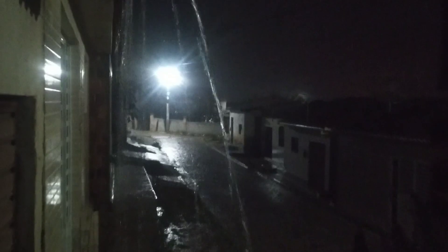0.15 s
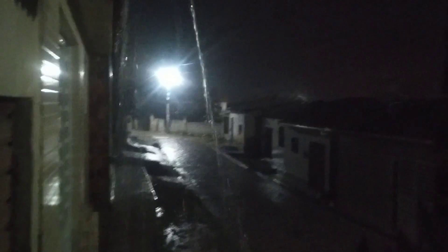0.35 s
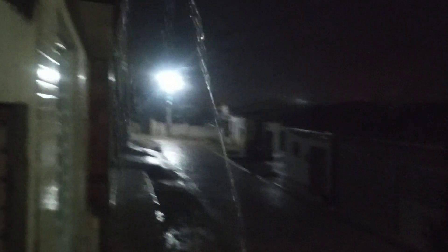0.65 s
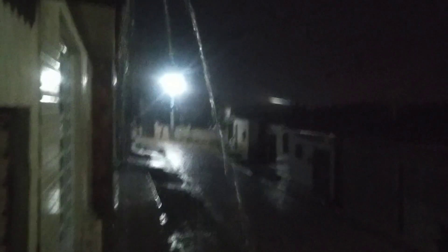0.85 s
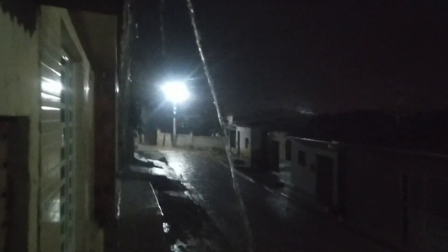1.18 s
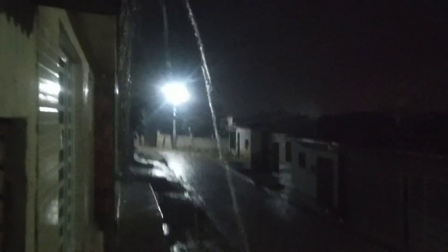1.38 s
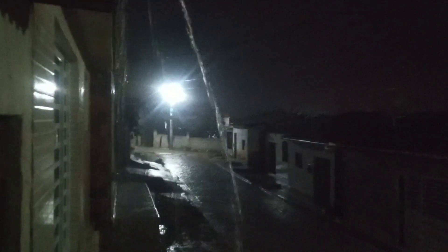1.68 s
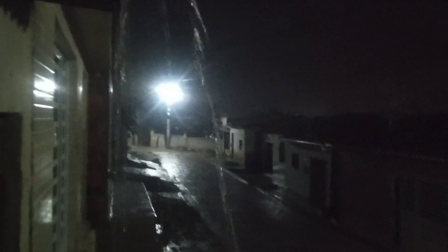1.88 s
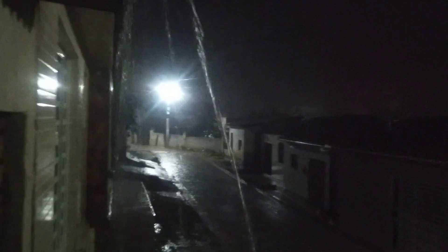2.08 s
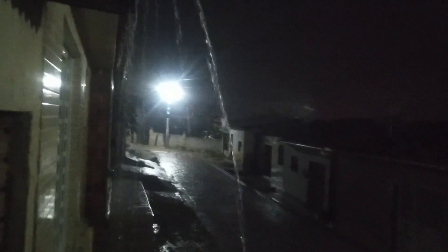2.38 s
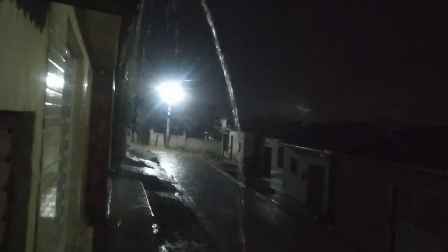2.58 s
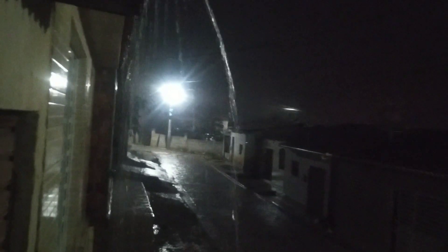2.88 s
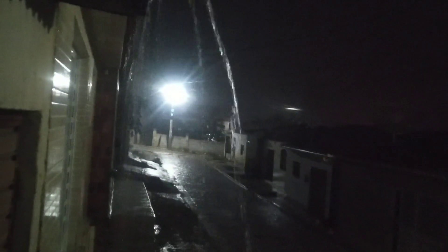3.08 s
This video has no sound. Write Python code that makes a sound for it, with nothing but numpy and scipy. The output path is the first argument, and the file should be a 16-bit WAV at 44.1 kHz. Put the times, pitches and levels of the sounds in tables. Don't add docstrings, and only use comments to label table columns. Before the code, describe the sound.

Silence until about 0.27 s, then heavy rain appears abruptly: a broad, slightly dull wash with fine nearby ticks, a low roof drone and short splashes. Roof runoff churns on the ground, swelling near 0.7 and 1.2 s. From 1.25 s wind rumbles, thumps and hisses on the small microphone, with sharp drop pops around 1.3, 1.6-1.8 and 2.6-2.9 s. A hard splash hits at 2.3 s; runoff grows stronger as rain eases toward 3.25 s.

```python
import sys
import numpy as np
from scipy import signal
from scipy.fft import rfft, irfft, next_fast_len
from scipy.io import wavfile
from scipy.ndimage import uniform_filter1d, map_coordinates

SR = 44100
rng = np.random.default_rng(int(sys.argv[2]) if len(sys.argv) > 2 else 0)


def attenuation_scalar(level_db):
    decades = np.asarray(level_db, float) / 20
    return 10 ** decades


def unload_audio(sound):
    columns = np.transpose(np.atleast_2d(sound))
    steps = np.round(np.clip(columns, -1, 1) * 32767)
    wavfile.write(sys.argv[1], SR, steps.astype(np.int16))


N = 143325
T = np.arange(N) / SR
PORT_TOP_HZ = 5600


def unit(x):
    return x / np.sqrt(np.mean(x ** 2) + 1e-20)


def shape(points):
    f, v = np.transpose(points)
    return lambda hz: attenuation_scalar(np.interp(np.log(hz + 1), np.log(f + 1), v))


def curves(rows):
    s, *cols = np.transpose(rows)
    return [np.interp(T, s, c) for c in cols]


def wobble(rate):
    return map_coordinates(rng.standard_normal(4000), [T * rate])


def filtered(x, response):
    m = next_fast_len(len(x) + 8192)
    hz = np.fft.rfftfreq(m, 1 / SR)
    return irfft(rfft(x, m) * response(hz), m)[:len(x)]


def patches(shape_2d, bins, frames):
    field = uniform_filter1d(rng.standard_normal(shape_2d), size=bins, axis=0)
    return unit(uniform_filter1d(field, size=frames, axis=1))


def rush(response, patchy_db):
    z = signal.stft(rng.standard_normal(N), nperseg=256)[2]
    gain = attenuation_scalar(patchy_db * patches(z.shape, bins=7, frames=9))
    noise = signal.istft(z * gain, nperseg=256)[1][:N]
    return unit(filtered(noise, response))


def dulled(x):
    return filtered(x, lambda f: 1 / np.sqrt(1 + (f / 10500) ** 6))


def droplets(count, hz, spread, cycles, size_db):
    u = rng.random((count, 3))
    n = np.arange(160)
    t = n / SR
    pitch = np.clip(hz * np.exp(spread * rng.standard_normal(count)), 500, 14000)[:, None]
    size = attenuation_scalar(-size_db * np.log(u[:, 1:2] + 1 / 50))
    envelope = np.exp(-t * pitch / cycles) * np.tanh(t * pitch)
    grain = size * envelope * np.sin(2 * np.pi * pitch * t)
    at = (u[:, 0] * N).astype(int)[:, None] + n
    return unit(np.bincount(at.ravel(), grain.ravel(), N + 160)[:N])


# time_s, rain_db, stream_nearness_db
RAIN = [(.28, -57.5, -19), (.45, -54, -22), (.72, -53.5, -5), (.9, -54.5, -18), (1.15, -53, 4),
        (1.35, -54, -9), (1.62, -53.5, 4), (1.9, -54, -3), (2.15, -52.5, -16), (2.36, -54, 8),
        (2.55, -53.5, 5.5), (2.75, -55.5, 11), (2.98, -58, 10), (3.12, -58, 11), (3.25, -58.5, 11)]
# freq_hz, density_db
FAR = [(71, -39), (120, -3), (532, -5), (800, -0.5), (867, 0.5), (4340, -8.5), (7850, -13), (13600, -27.5),
       (15700, -37)]


def rain():
    rain_db = curves(RAIN)[0]
    wash_db = 7.5 + 0.4 * wobble(5.71) + 0.97 * wobble(30.15)
    wash = attenuation_scalar(wash_db) * rush(shape(FAR), patchy_db=1.65)
    clump_db = 2.5 * np.tanh(wobble(30.08)) * 1.5
    ticks = droplets(count=5000, hz=5000, spread=0.503, cycles=3.6, size_db=5.5)
    patter = attenuation_scalar(1 + clump_db) * ticks
    return attenuation_scalar(rain_db) * (wash + dulled(patter))


# freq_hz, density_db
STREAM = [(300, -60), (800, -5.5), (1500, 2.5), (2200, 3), (2900, -1), (4000, -36), (9000, -36)]


def stream():
    near_db = curves(RAIN)[1]
    level_db = -56.5 + near_db + 1.0 * wobble(24.7)
    return attenuation_scalar(level_db) * rush(shape(STREAM), patchy_db=1.5)


# time_s, wind_db
WIND = [(.32, -53.5), (1.2, -59), (1.3, -43.5), (1.47, -42), (1.57, -35.5), (1.66, -43), (1.8, -33),
        (1.87, -39.5), (1.94, -44), (2.02, -33.5), (2.13, -37.5), (2.25, -40.5), (2.4, -42.5), (2.55, -41),
        (2.75, -38), (2.93, -34), (3.04, -40.5), (3.25, -39.5)]
# freq_hz, density_db
RUMBLE = [(7.1, -49), (12, 11.5), (25, -3), (194, -19), (294, -20.5), (385, -24.5), (900, -27), (1170, -59),
          (1980, -120)]


def buffeting():
    wind_db, = curves(WIND)
    uneven = attenuation_scalar(1.2 * wobble(24.94)) * rush(shape(RUMBLE), patchy_db=1.5)
    return attenuation_scalar(wind_db - 0.5) * unit(uneven)


# time_s, hiss_db
DRAUGHT = [(1.2, -57), (1.33, -54), (1.5, -48), (1.59, -46.5), (1.65, -54), (1.75, -49), (1.8, -50),
           (1.95, -83), (2.12, -47), (2.2, -58), (2.3, -49), (2.42, -57), (2.62, -57), (2.71, -45.5),
           (2.8, -55.5), (2.91, -44.5), (2.97, -50.5), (3.25, -54.5)]
# centre_hz, width_hz, gain_db
PORT = [(2000, 300, -7.5), (4340, 1400, 22.5)]


def cavity(f):
    modes = sum(attenuation_scalar(db) * 1j * f * w / (c * c - f * f + 1j * f * w) for c, w, db in PORT)
    return modes / (1 + (f / PORT_TOP_HZ) ** 4)


def port_hiss():
    wind_db, = curves(WIND)
    draught_db, = curves(DRAUGHT)
    level_db = draught_db + 0.083 * (wind_db - wind_db.mean()) + 3.4 * wobble(60)
    return attenuation_scalar(level_db) * rush(cavity, patchy_db=2)


# centre_s, pressure, half_width_s
SHOVES = [(1.2723, -0.051, 0.0023), (1.5514, -0.027, 0.0027), (1.5977, -0.11, 0.00069),
          (1.602, -0.21, 0.0029), (1.8345, 0.054, 0.0029), (1.844, -0.027, 0.003), (1.869, 0.034, 0.0028),
          (1.888, 0.0098, 0.0035), (1.855, 0.036, 0.0034), (1.965, -.015, 0.0035), (2.059, -0.027, 0.0032),
          (2.095, -0.016, .004), (2.243, 0.028, 0.0021), (2.324, 0.02, 0.0036), (2.463, 0.022, 0.0057),
          (2.487, -0.02, .004), (2.1454, -0.034, 0.0033), (2.561, -0.07, 0.0012), (2.5643, 0.068, 0.0056),
          (2.7543, 0.037, .004), (2.7666, -0.028, 0.0028), (2.791, -0.056, 0.0035), (2.885, -0.11, 0.0036),
          (2.898, 0.057, 0.0065), (2.915, -0.066, 0.0024), (2.9605, 0.028, 0.0084), (2.988, -0.03, 0.00143),
          (2.729, -0.043, 0.0023), (2, -0.034, 0.0029), (2.068, -0.001, .003), (3.127, -0.00069, 0.0019),
          (3.176, 0.023, 0.0014), (3.2427, 0.016, 0.002)]


def shoves():
    edge, leak_hz = 3.4, 7.2
    push = sum(p * np.exp(-np.abs((T - s) / w) ** edge) for s, p, w in SHOVES)
    return filtered(push, lambda f: 1j * f / (leak_hz + 1j * f))


# start_s, ring_peak, puff_peak, pressure_step, step_life_s
POPS = [(1.33332, -.03, -.13, -.011, .006), (1.33347, .085, .12, -.02, .018),
        (1.5718, .19, .04, .13, .0009), (1.6883, .3, .42, .026, .0056), (1.73438, -.08, -.2, 0, .001),
        (1.73453, .19, .22, .014, .0007), (1.74513, .06, 0, .12, .0005), (1.76393, .09, .21, -.1, .001),
        (2.11984, .07, .07, 0, .001), (2.2142, 0, 0, .04, .0005), (2.5815, 0, 0, -.03, .0003),
        (2.588, 0, .02, -.08, .0008), (2.6198, 0, 0, -.085, .0009), (2.68193, 0, -.02, .11, .005),
        (2.68262, -.02, -.1, -.1, .005), (2.7931, .11, -.45, -.85, .00013), (2.89738, .02, 0, .14, .0028)]


def pops():
    ring_hz, ring_t60_s = 4100, .0036
    puff_s, step_rise_s = .00008, .00008
    out = np.zeros(N)
    for s, ring, puff, step, life in POPS:
        t = np.clip(T - s, 0, None)
        out += ring * attenuation_scalar(-60 * t / ring_t60_s) * np.sin(2 * np.pi * ring_hz * t)
        age = (T - s) / puff_s
        recoil = .36 * np.exp(-(age - 3) ** 2 / 2)
        out += puff * (np.exp(-(age - 1) ** 2) - recoil)
        out += step * (1 - np.exp(-t / step_rise_s)) * np.exp(-t / abs(life))
    return filtered(out, lambda f: 1 / np.sqrt(1 + (f / PORT_TOP_HZ) ** 6))


# start_s, peak_db, centre_hz, t60_s
SPLASH = [(0.317, -41, 3200, 0.014), (0.364, -29.5, 5570, 0.028), (0.416, -33.5, 7700, 0.044),
          (.495, -41, 2800, 0.18), (0.514, -28, 4300, 0.037), (0.54, -35, 5560, 0.046),
          (0.638, -38, 5500, 0.022), (0.6996, -25.5, 5260, 0.015), (0.715, -34, 2600, 0.069),
          (0.939, -31.5, 4800, 0.044), (.75, -39, 1600, 0.056), (.957, -35.5, 8500, 0.022),
          (1.12, -39, 8000, .02), (1.145, -38, 2800, 0.055), (1.177, -32, 2500, .02),
          (1.001, -40, 5600, 0.035), (1.169, -32, 6500, 0.021), (1.427, -32, 3980, 0.046),
          (1.486, -36, 1900, 0.033), (1.503, -37, 1700, .04), (1.534, -39.5, 4500, .02),
          (1.516, -37, 7200, 0.029), (1.6747, -36, 4100, 0.0085), (1.7462, -28, 3150, 0.034),
          (1.789, -28.5, 2500, .015), (1.788, -38, 6470, .012), (1.83, -31.5, 1730, 0.028),
          (1.7655, -33, 1500, 0.034), (1.933, -46, 10000, .03), (2.07, -44, 4400, 0.076),
          (2.106, -35.5, 3500, 0.11), (2.1194, -29.5, 5770, 0.014), (2.135, -40, 3500, .06),
          (2.16, -42.5, 6440, 0.073), (2.247, -27, 3380, 0.022), (2.287, -32, 3400, 0.017),
          (2.3019, -20, 2980, .012), (2.3018, -25, 1300, .01), (2.304, -36, 1410, 0.096),
          (2.322, -32, 1600, .05), (2.326, -32, 3780, 0.017), (2.527, -34.5, 5860, 0.017),
          (2.89, -27.5, 2000, 0.021), (2.598, -41, 6500, 0.032), (2.692, -26.5, 1890, 0.035),
          (2.698, -36.5, 4400, 0.099), (2.902, -29, 3400, 0.045), (2.919, -38, 4100, 0.026),
          (2.96, -39, 4800, .02), (2.979, -41.5, 6860, 0.18), (3.088, -36, 5000, 0.18),
          (3.162, -40, 5300, 0.13)]


def splashes():
    width_oct, rise_share = .7, 0.038
    t = np.arange(SR // 5) / SR
    out = np.zeros(N + SR)
    for s, db, hz, t60 in SPLASH:
        band = lambda f: 1 / (1 + np.abs(np.log2((f + 1) / hz) / width_oct) ** 3)
        spray = filtered(rng.standard_normal(len(t)), band)
        decay = attenuation_scalar(db - 1 - 60 * t / max(t60, .004))
        swell = decay * (1 - np.exp(-t / (rise_share * t60)))
        level = np.sqrt(np.mean(swell ** 2))
        out[round(s * SR):][:len(t)] += unit(spray * swell) * level
    return dulled(out[:N])


# freq_hz, density_db
DRONE = [(30, -26), (55, 7.5), (68, 0.5), (120, -7.5), (200, -26), (400, -31.5)]


def roof_drone():
    return attenuation_scalar(-53.5) * rush(shape(DRONE), patchy_db=1.5)


def scene():
    wind = buffeting() + port_hiss() + shoves()
    return (rain() + stream() + wind + pops() + splashes() + roof_drone())[None]


# freq_hz, level_db
WHINE = [(13316, -90), (13916, -87), (14516, -87), (15116, -89)]


def whine():
    return np.sqrt(2) * sum(attenuation_scalar(db) * np.sin(2 * np.pi * hz * T) for hz, db in WHINE)


# centre_s, half_width_s, hole_growth
STARVED = [(1.53, .04, .8), (1.578, .012, 3), (1.692, .01, 2.2), (1.71, .012, 3.2), (1.733, .01, 2.2),
           (1.79, .07, .6), (2.526, .008, 1.3), (2.56, .04, .5), (2.692, .012, 2.4), (2.74, .04, .8),
           (2.83, .04, .5)]


def holed(x):
    all_hz, spread_hz = 15900, 1300
    hz, s, z = signal.stft(x, SR, nperseg=1024)
    starved = sum(grow * np.exp(-((s - at) / w) ** 2) for at, w, grow in STARVED)
    threshold = (hz[:, None] - all_hz) / spread_hz + starved
    kept = patches(z.shape, bins=5, frames=5) > threshold
    return signal.istft(z * kept, SR, nperseg=1024)[1][:N]


def low_pass(x):
    return signal.sosfilt(signal.butter(12, 15745, fs=SR, output="sos"), x)


def record(dry):
    wake_s, fade_s = 0.272, 0.012
    offset_fast_s, offset_slow_s = 0.051, 0.12
    t = np.clip(T - wake_s, 0, None)
    heard = filtered(holed(dry[0]) + whine(), lambda f: f < 15550)
    fade = np.clip(t / fade_s, 0, 1) ** 0.18
    offset = -0.13 * 1.54 * (np.exp(-t / offset_slow_s) - np.exp(-t / offset_fast_s))
    mix = (heard * fade + offset)[None]
    return low_pass(mix)


dry = scene()
out = record(dry)
unload_audio(out)
```